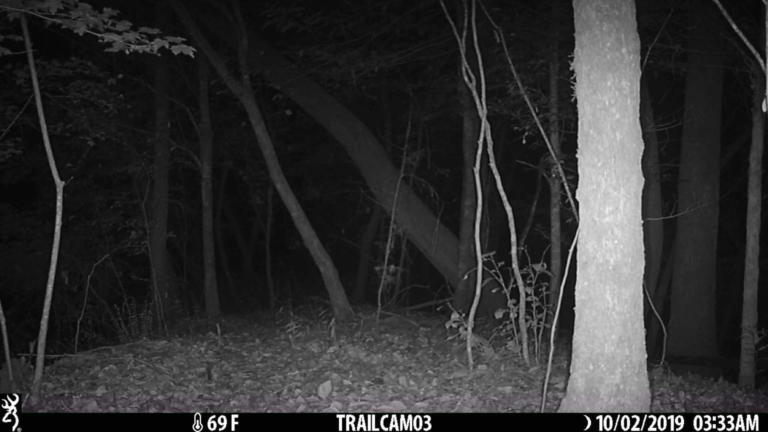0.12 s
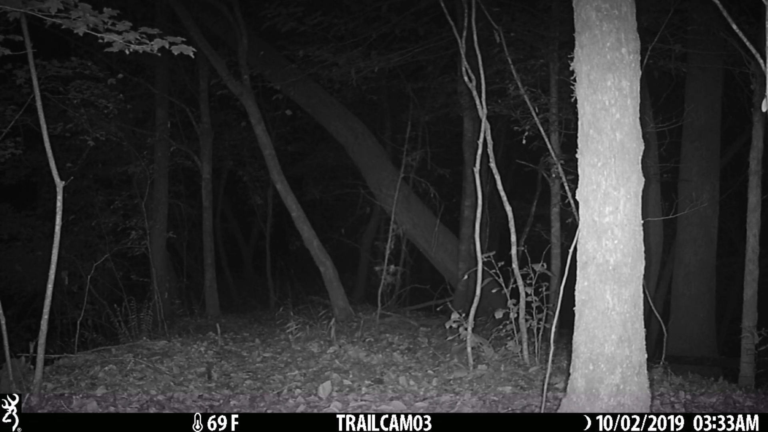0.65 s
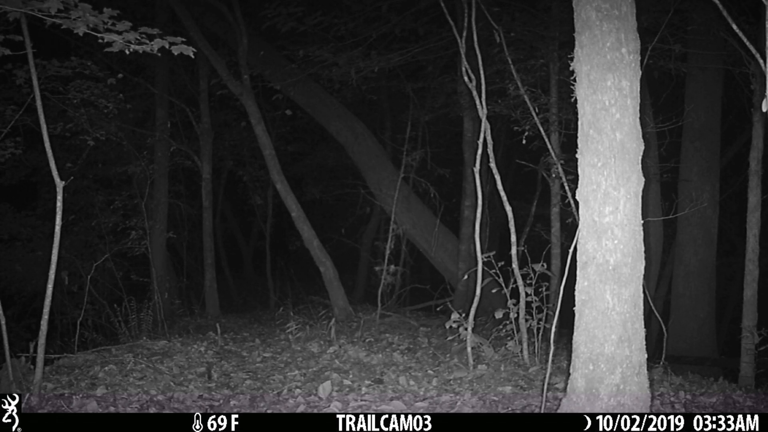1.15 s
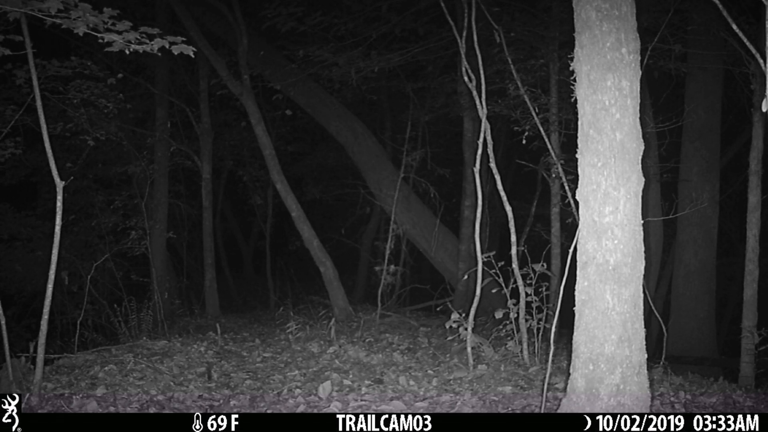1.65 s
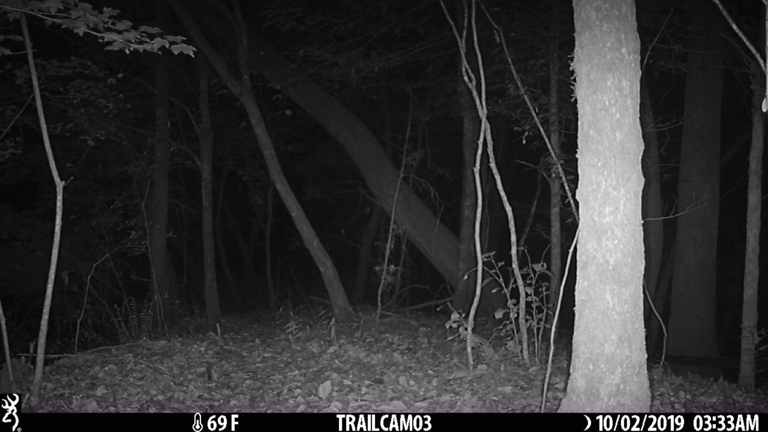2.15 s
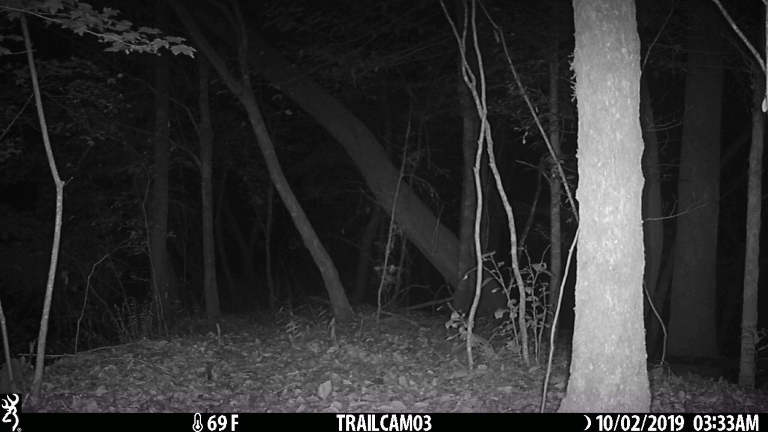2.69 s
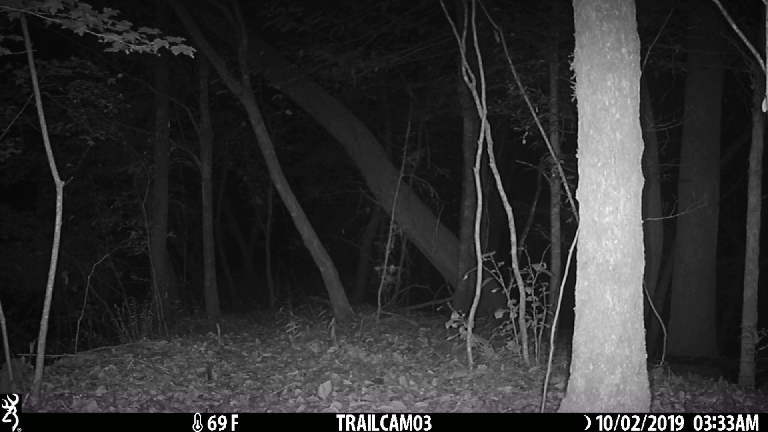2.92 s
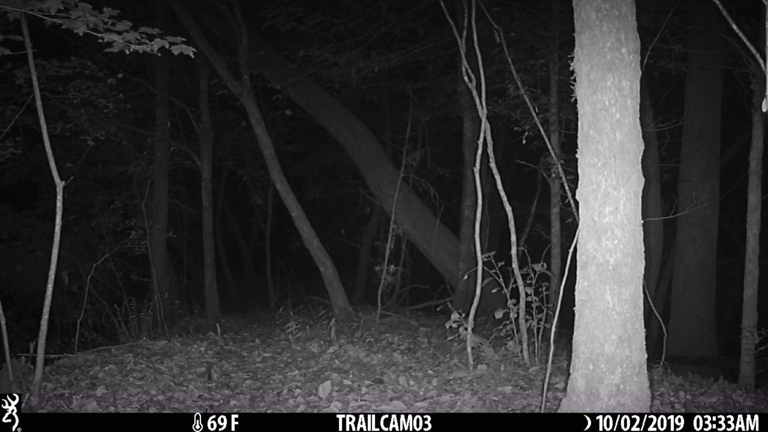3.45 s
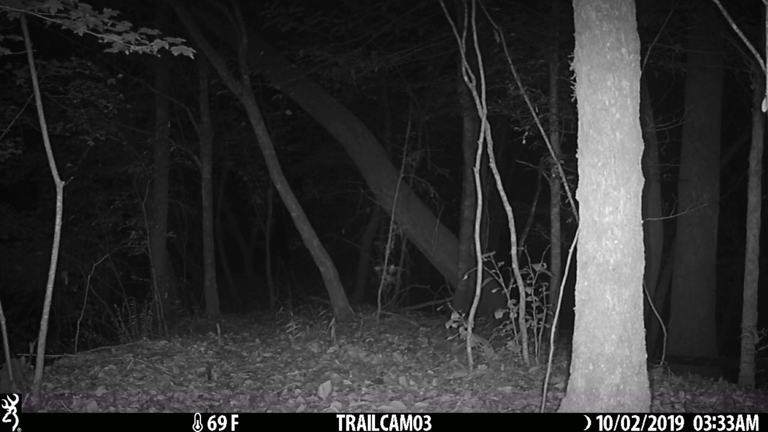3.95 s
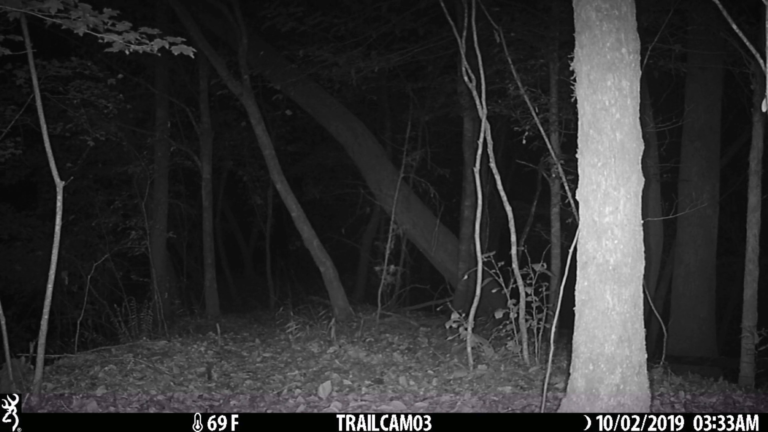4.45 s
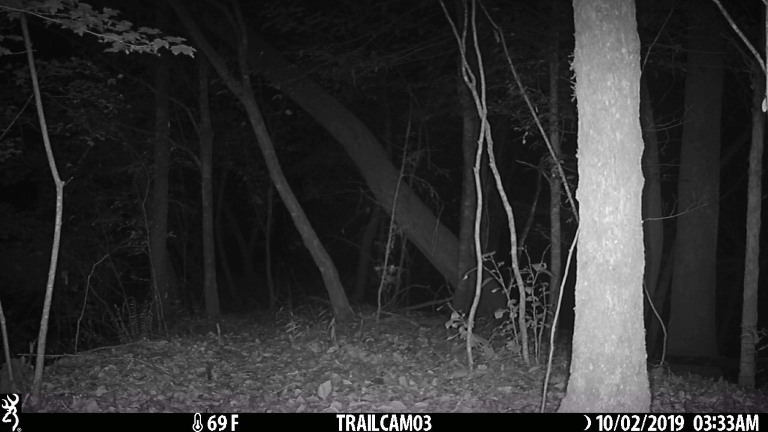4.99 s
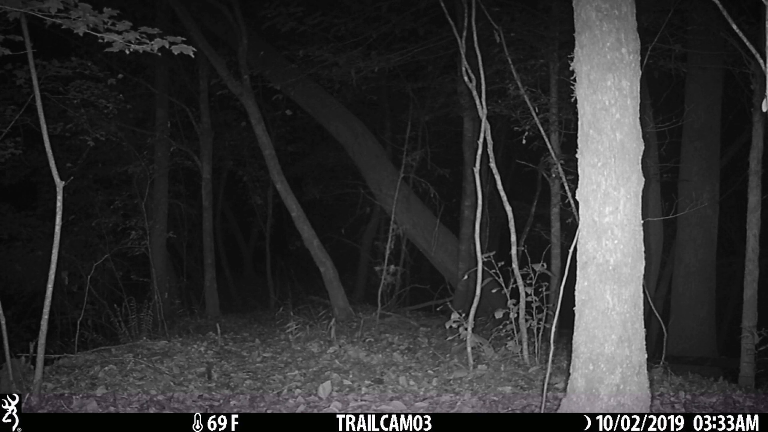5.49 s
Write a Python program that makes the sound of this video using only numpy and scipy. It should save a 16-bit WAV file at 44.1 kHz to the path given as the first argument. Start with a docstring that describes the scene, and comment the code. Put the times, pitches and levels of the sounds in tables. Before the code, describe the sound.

Crowds of crickets trill continuously in a wood at night, layered at several pitches. The strongest middle-high trill stays nearly steady with a quick flutter, while the shrillest surges and sinks irregularly. A smooth band of distant ground crickets lies above, with faint katydid rasps in the treble. Trunks blur the sound slightly. A fixed microphone adds low hiss; one tiny dry click comes near the end.

```python
"""A wood at night, 5.6 s.
Throughout, seven kinds of crickets trill in crowds: short falling tones, each kind on its own pitch and stroke rate.
A blur of far ground crickets, a fused noise band, lies above them; katydids rasp faintly as gated treble noise.
Still air and the microphone hiss below. The two highest kinds surge and sink together; one click falls near the end."""
import sys
import numpy as np
from scipy import signal
from scipy.fft import rfft, irfft
from scipy.io import wavfile

SR = 44100
rng = np.random.default_rng(int(sys.argv[2]) if len(sys.argv) > 2 else 0)


def transcribe(signal):
    """Save signal, clipped to [-1, 1], as a 16-bit WAV file at the path in sys.argv[1]."""
    frames = np.atleast_2d(signal).T
    limited = np.clip(frames, -1, 1)
    pcm = np.round(limited * 32767).astype(np.int16)
    wavfile.write(sys.argv[1], SR, pcm)


def volts(x):
    """Linear amplitude factor 10**(x/20) for a level x in dB, scalar or array-like."""
    e = np.asarray(x, float) / 20
    return 10 ** e


N = 247401


def in_time(rows):
    """Join rows (time_s, value) by straight lines, one value a sample."""
    return np.interp(np.arange(N) / SR, *np.transpose(rows))


def rms_one(x):
    """Scale to rms 1."""
    return x / np.sqrt(np.mean(x ** 2) + 1e-20)


def coloured_noise(spectrum):
    """White noise shaped by (freq_hz, level_db) points joined on a log axis, rms 1."""
    white = rng.standard_normal(N)
    freq_hz, level_db = np.transpose(spectrum)
    log_hz = np.log(np.fft.rfftfreq(N, 1 / SR) + 1)
    gain = volts(np.interp(log_hz, np.log(freq_hz), level_db))
    return rms_one(irfft(rfft(white) * gain, N))


def drift(count, points_per_s):
    """Slow chance: random points joined by straight lines, one row a singer."""
    points = rng.standard_normal((count, 100))
    where = np.minimum(np.arange(N) / SR * points_per_s, 98.9)
    return np.array([np.interp(where, np.arange(100), row) for row in points])


def air_and_microphone_hiss():
    """Steady coloured noise of still air and microphone, and a broad wash of sound near 3 kHz among the
    crickets' pitches."""
    # hiss spectrum, plus a broad wash near 3 kHz among the crickets: freq_hz, relative level_db per Hz
    hiss_spectrum = [(20, -30), (50, -18), (120, -8.5), (300, -3), (600, -0.7), (1000, 0.0), (1700, -1),
                     (3000, 3.5), (5000, -4), (8000, -7.5), (12000, -9), (16000, -13)]
    return volts(-56.5) * coloured_noise(hiss_spectrum)


def ground_crickets():
    """Too many and too far to tell apart: their strokes fuse into a band of noise."""
    # spectrum of the blur: freq_hz, relative level_db per Hz
    blur_spectrum = [(4700, -23), (4950, -14), (5080, -10), (5170, -5.5), (5450, -0.5), (5750, -0.5),
                     (6050, -1.5), (6300, -6.5), (6600, -15), (7000, -19), (7600, -40), (9000, -50)]
    return volts(-52.5) * coloured_noise(blur_spectrum)


def katydids():
    """Broad scraping noise, gated as a fast steady buzz and as short separate rasps."""
    # buzz level before its flutter: time_s, level_db
    buzz_levels = [(0, -72), (1, -70), (2, -73), (2.9, -71), (3.3, -67), (4.2, -67.5), (5.61, -68)]
    # clearest rasps: start_s, peak_db of the gate
    clear_rasps = [(1.11, -71.5), (1.21, -67), (1.34, -69), (1.58, -72), (1.72, -72), (1.9, -71),
                   (2.06, -69), (2.25, -68), (2.38, -70), (2.67, -71), (2.81, -70), (2.93, -76),
                   (3.47, -70), (3.98, -77), (4.14, -71)]
    # scrape spectrum: freq_hz, relative level_db per Hz
    scrape_spectrum = [(6000, -21), (8000, -2), (10000, -2.5), (12500, -2), (13600, 3), (14500, -11),
                       (16000, -2)]
    buzz_per_s, half_rasp_s = 24, 0.037 / 2
    faint_count, faint_db = 16, -73
    t = np.arange(N) / SR
    buzz = volts(in_time(buzz_levels)) * (1 + 0.37 * np.sin(2 * np.pi * buzz_per_s * t))
    faint_rasps = [(start_s, faint_db) for start_s in rng.random(faint_count) * N / SR]
    rasps = np.zeros(N)
    for start_s, peak_db in list(clear_rasps) + faint_rasps:
        rasps += volts(peak_db) * np.exp(-((t - start_s - half_rasp_s) / half_rasp_s) ** 2)
    return (buzz + rasps) * coloured_noise(scrape_spectrum)


def tick():
    """One dry click: an impulse that decays in well under a millisecond."""
    # click: start_s, peak_db
    clicks = [(5.3851, -28)]
    impulses = np.zeros(N)
    for start_s, peak_db in clicks:
        impulses[round(start_s * SR)] = volts(peak_db)
    return signal.lfilter([1], [1, -.6], impulses)


def crowd_levels():
    """Level in dB of each crowd, lowest pitch first, steady or over time."""
    # second-lowest kind, more singers join: time_s, level_db
    joining = [(0.0, -57.5), (1.59, -56.5), (2.14, -55), (5.36, -55), (5.61, -55)]
    # even throbs of the fourth and fifth kind: mean_db, swing_db, period_s, first_peak_s
    throb_rows = [(-40.5, 1, .29, 0.17), (-49.5, 3.5, 1.505, 1.2)]
    # surges of the highest kind: time_s, level_db
    surge_rows = [(0, -46), (.2, -38.5), (.45, -35), (.62, -38), (.84, -46), (1.1, -40), (1.5, -40),
                  (1.8, -36.5), (2.08, -34), (2.2, -40.5), (2.38, -43), (2.55, -38), (2.75, -39),
                  (3.12, -43.5), (3.38, -33.5), (3.72, -41), (4.3, -40.5), (4.55, -39.5), (5.25, -38.5),
                  (5.42, -44), (5.61, -38)]
    lowest_db, third_db, sixth_mean_db = -60, -71, -51
    sixth_share = 0.44  # of the highest kind's surges, in dB
    t = np.arange(N) / SR
    fourth_db, fifth_db = (mean_db + swing_db * np.cos(2 * np.pi * (t - peak_s) / period_s)
                           for mean_db, swing_db, period_s, peak_s in throb_rows)
    highest_db = in_time(surge_rows)
    sixth_db = sixth_mean_db + sixth_share * (highest_db - highest_db.mean())
    return lowest_db, in_time(joining), third_db, fourth_db, fifth_db, sixth_db, highest_db


def crowd(count, pitch_hz, spread_hz, thinning_db, fall_hz, strokes_per_s, rate_spread, sounding):
    """Each singer closes its wings at its own slightly wandering rate; every stroke is a short falling tone."""
    fading_db, uneven_db = 1.5, 1.5
    rate_wander, stray = .3, .3  # shares of rate_spread and of spread_hz
    place = np.linspace(-3, 3, count)[:, None]  # in pitch spreads
    loudness = volts(-thinning_db * np.abs(place) ** 1.02 + fading_db * drift(count, 3.05))
    rate_offset = rng.standard_normal((count, 1)) + rate_wander * drift(count, 1.5)
    rate_hz = strokes_per_s * (1 + rate_spread * rate_offset)
    strokes = rng.random((count, 1)) + np.cumsum(rate_hz, axis=1) / SR
    within = np.minimum(strokes % 1 / sounding, 1)  # 0 to 1 through the sounding part
    # each stroke draws its own strength and pitch
    number, singer = strokes.astype(int), np.arange(count)[:, None]
    chance = rng.standard_normal((2, count, 500))
    strength = volts(uneven_db * chance[0])[singer, number]
    stroke_hz = pitch_hz + spread_hz * (place + stray * chance[1][singer, number])
    tone_hz = stroke_hz - fall_hz * within ** 2
    tone = np.sin(2 * np.pi * np.cumsum(tone_hz, axis=1) / SR)
    envelope = np.sin(np.pi * within) ** 0.95
    return rms_one(np.sum(loudness * strength * envelope * tone, axis=0))


def crickets():
    """All kinds together, each crowd at its own level."""
    # kinds, lowest first: pitch_hz, spread_hz between singers, thinning_db per spread, fall_hz in a stroke,
    # strokes_per_s, rate_spread (share), sounding (share of a stroke)
    kinds = [(2080, 30.0, 3.5, 50.0, 53.0, .02, .8), (2486, 45.0, 1.5, 70.0, 50.0, .05, .8),
             (2796, 40.0, 7, 25, 50, 0.0038, 0.51), (3665, 125.0, 4, 200.0, 41.0, .08, .65),
             (3840, 40.0, 6.5, 100.0, 45.0, .03, .6), (4290, 75.0, 5.5, 110, 42.0, .02, 0.37),
             (4603, 105.0, 8, 100.0, 42.3, .015, .7)]
    # singers of each kind: count
    singer_counts = (9, 11, 3, 23, 7, 11, 19)
    out = np.zeros(N)
    for count, kind, level_db in zip(singer_counts, kinds, crowd_levels()):
        out += volts(level_db) * crowd(count, *kind)
    return out


def wood(x):
    """Trunks scatter the sound: decaying echoes, phase only, smear it in time and leave its colour."""
    t60_s, echoes_db = 0.28, -0.5  # echo energy before flattening, against a direct sound of 1
    t = np.arange(N) / SR
    echoes = rng.standard_normal(N) * volts(-60 * t / t60_s)
    echoes *= volts(echoes_db) / np.sqrt(np.sum(echoes ** 2))
    echoes[0] = 1  # direct sound
    response = rfft(echoes)
    return irfft(rfft(x) * response / np.abs(response), N)


def scene():
    """Crickets through the wood, over ground crickets, katydids, tick and hiss."""
    background = air_and_microphone_hiss() + ground_crickets() + katydids() + tick()
    return (background + wood(crickets()))[None]


def roll_off(x):
    """The treble ends steeply here."""
    return signal.sosfilt(signal.butter(12, 15760, fs=SR, output="sos"), x)


def record(dry):
    """Pass on the finished mix."""
    return roll_off(dry)


dry = scene()
out = record(dry)
transcribe(out)
```